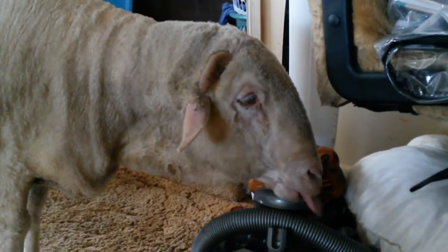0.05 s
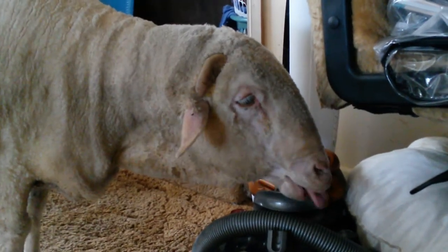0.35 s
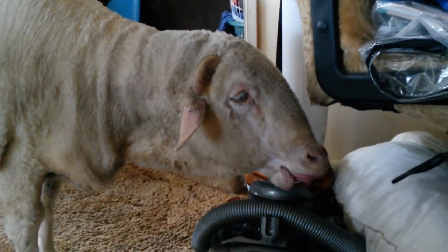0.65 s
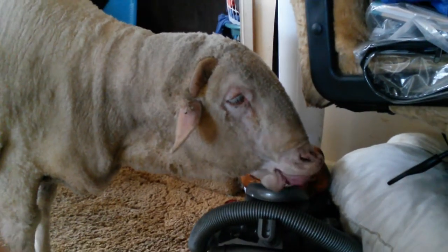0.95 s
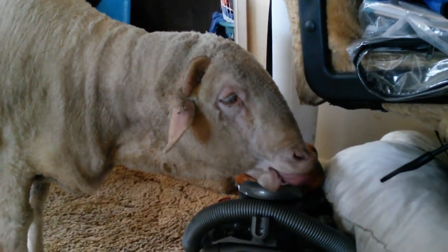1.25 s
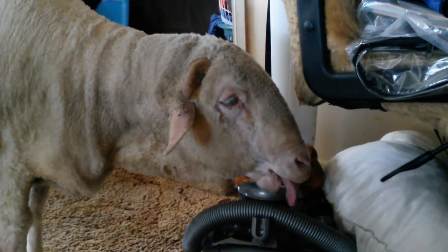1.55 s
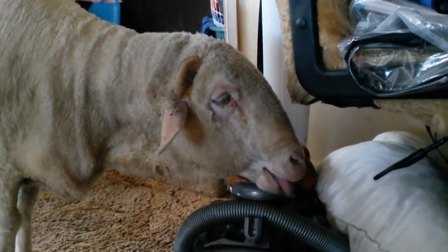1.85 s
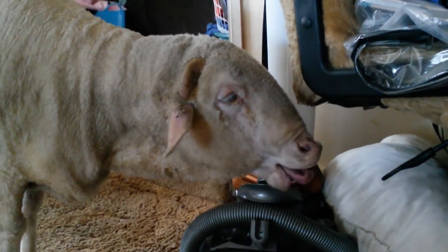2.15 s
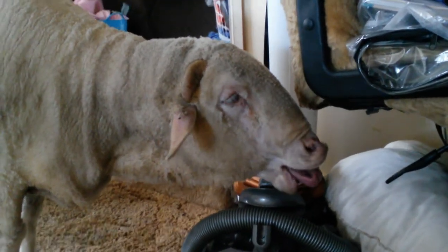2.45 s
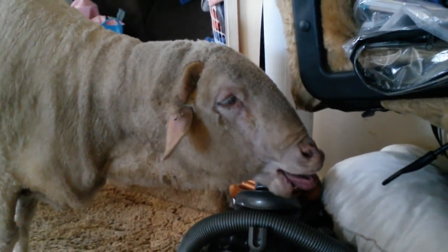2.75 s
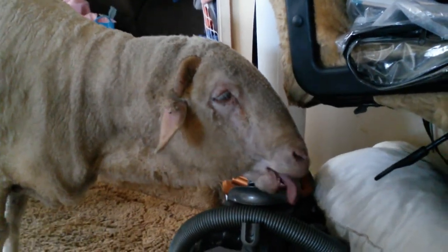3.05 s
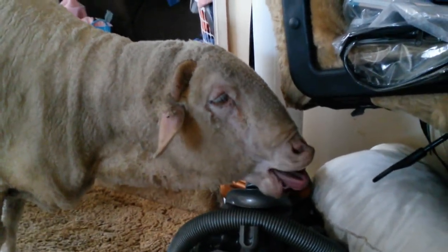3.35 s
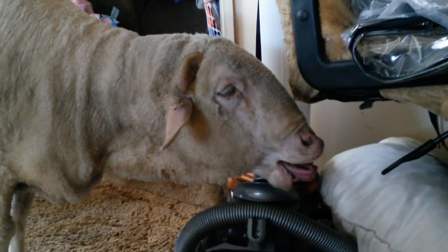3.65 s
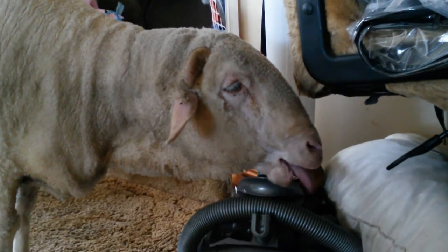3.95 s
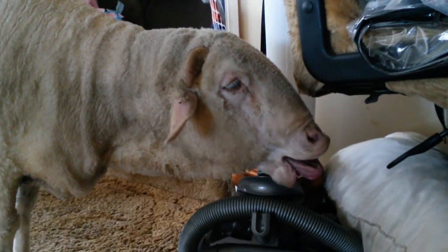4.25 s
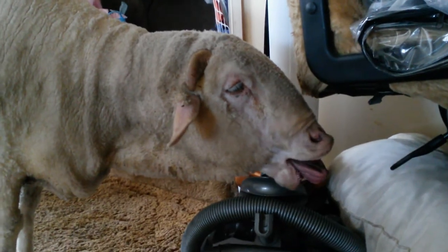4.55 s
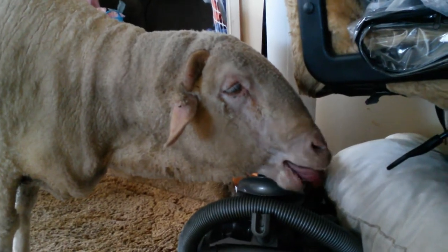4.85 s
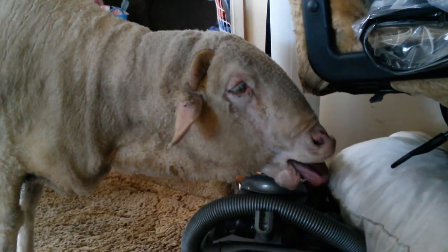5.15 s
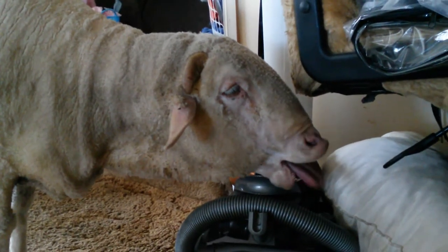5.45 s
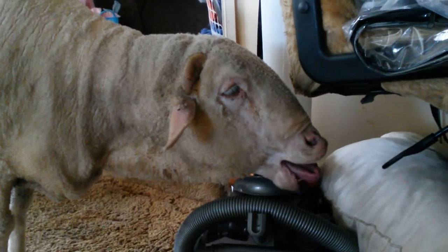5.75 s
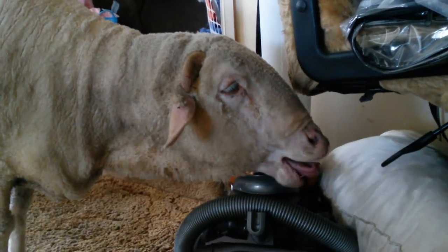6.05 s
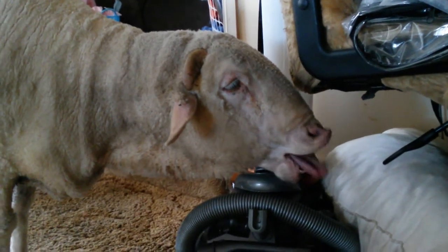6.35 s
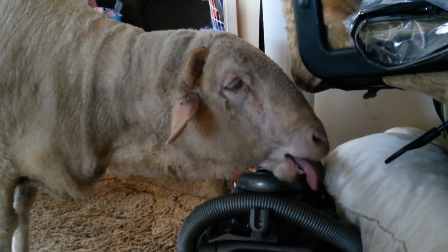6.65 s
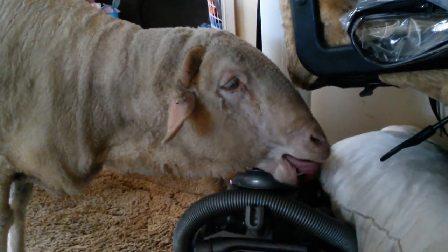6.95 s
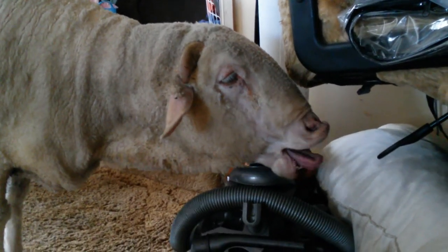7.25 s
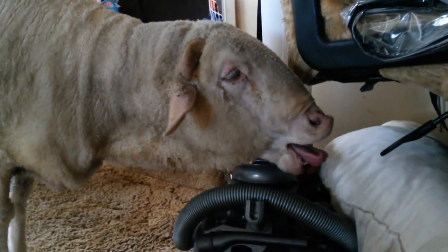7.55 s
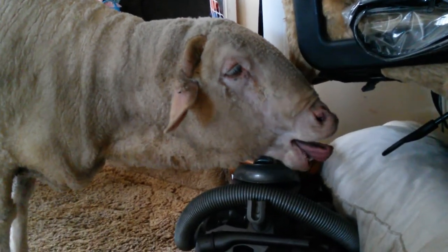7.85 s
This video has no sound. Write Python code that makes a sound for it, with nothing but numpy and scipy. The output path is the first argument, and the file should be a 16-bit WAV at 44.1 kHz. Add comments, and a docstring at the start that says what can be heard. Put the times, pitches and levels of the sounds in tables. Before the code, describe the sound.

A canister vacuum cleaner runs steadily close by, with a high whine over rushing, hissing air.

```python
"""First comes the steady roar and whine of a canister vacuum cleaner, close by in a carpeted room.
Air rushes through its body and hisses out of the vents.
The fan's eleven blades whine over the tone of the spinning shaft and a low electric hum.
The tones slowly swell and fade.
Near six seconds, fingers give the hand-held recorder a few soft bumps."""
import sys
import numpy as np
from scipy import signal
from scipy.fft import rfft, irfft, next_fast_len
from scipy.io import wavfile
from scipy.ndimage import map_coordinates

SR = 44100
rng = np.random.default_rng(int(sys.argv[2]) if len(sys.argv) > 2 else 0)


def materialize(psi):
    """Save the field psi as 16-bit PCM at rate SR to the path in sys.argv[1].

    A 1-D psi becomes a single channel; in a 2-D psi each row is a channel.
    """
    bounded = np.clip(np.atleast_2d(psi).T, -1, 1)
    quanta = np.round(bounded * 32767).astype(np.int16)
    wavfile.write(sys.argv[1], SR, quanta)


N = 356769
TIME = np.arange(N) / SR  # seconds


def amp(db):
    """Turn decibels into a number to multiply by."""
    return 10 ** (np.asarray(db) / 20)


def over_pitch(table, hz):
    """Read a table's columns at the given frequencies, on a logarithmic scale."""
    table_hz, *columns = np.transpose(table)
    return np.array([np.interp(np.log(hz + 1), np.log(table_hz + 1), column) for column in columns])


def over_time(table):
    """Join a table's (time, value) points with straight lines, one value per sample."""
    times, values = np.transpose(table)
    return np.interp(TIME, times, values)


def wobble(rate):
    """A smooth random curve through `rate` points a second."""
    points = rng.standard_normal(int(N * rate / SR) + 4)
    return map_coordinates(points, [TIME * rate])


def filtered(x, response):
    """Multiply each frequency in x by response(hz)."""
    size = next_fast_len(N + SR // 2)
    hz = np.fft.rfftfreq(size, 1 / SR)
    return irfft(rfft(x, size) * response(hz), size)[..., :N]


def tone(turns):
    """A pure tone of average power 1, one wave per turn."""
    return np.sqrt(2) * np.sin(2 * np.pi * turns)


# How alike the air sounds on the left and right: f/Hz, likeness/0-1
LIKENESS = [(30, 0.4), (100, 0.74), (330, 0.94), (470, 0.4), (650, 0.97), (1500, 0.67), (1850, 0.33),
            (2080, 0.87), (2900, 0.14), (3800, 0.47), (5200, 0.6), (6200, 0), (14000, 0.26)]
# How far the left wave runs ahead of the right: f/Hz, lead/radians
LEFT_LEAD = [(100, 0), (1000, 0.5), (1400, 0.5), (2700, -0.5), (4700, 1.96), (5400, 1.7), (6300, -4.5),
             (7500, -0.1), (10500, 1.4), (13000, 2.5)]

def turbulence():
    """Swirling air makes noise at every pitch, partly alike on the two sides."""
    common, apart = rng.standard_normal((2, N)) * np.sqrt(SR / 2)  # 0 dB per Hz
    sides = np.array([[1], [-1]])
    spread = lambda hz: np.arccos(np.clip(over_pitch(LIKENESS, hz), 0, 1)) / 2
    lead = lambda hz: np.exp(.5j * sides * over_pitch(LEFT_LEAD, hz))
    shared = filtered(common, lambda hz: np.cos(spread(hz)) * lead(hz))
    opposed = sides * filtered(apart, lambda hz: np.sin(spread(hz)) * lead(hz))
    return shared + opposed


# Air rushing through the body: f/Hz, left base level/dB per Hz, right base level/dB per Hz
BODY_ROAR = [(20, -95, -93), (50, -77, -84), (88, -63.5, -64), (180, -64, -64), (326, -67, -64.5),
             (484, -68.5, -69.5), (658, -59.5, -59), (860, -62.5, -62), (1390, -61.5, -62.5),
             (1766, -58.5, -63.5), (1890, -64, -66), (2530, -61.5, -64.0), (2864, -69.5, -78.5),
             (3390, -65, -65)]
# Vent jets, aimed unevenly: f/Hz, left base level/dB per Hz, right base level/dB per Hz
VENT_HISS = [(4155, -58, -64), (4700, -47.5, -65), (5130, -45.5, -65.5), (5480, -50, -63),
             (6670, -64, -61.5), (7660, -70, -61.5), (9000, -72, -64.5), (10370, -70.5, -58.5),
             (11600, -86.5, -57), (12400, -69.5, -59.5), (13600, -65.5, -59.5), (14500, -67, -66.5)]
# Pitches the body and duct boost or weaken: f/Hz, half width/Hz, left boost/dB, right boost/dB
RESONANCES = [(248, 17, -1.5, -2), (462, 22, -4, -8), (535, 17, -3.5, -4), (655, 14, -0.5, 2),
              (784, 16, -1.5, -4.5), (1126, 26, 3.5, 4.5), (1335, 45, 5, -1), (2013, 20, 6.5, 5.5),
              (2087, 95, 13, 13.5), (2890, 110, 1.5, 2.5), (3086, 30, 8, 8.5), (3435, 40, -11, -5),
              (3846, 74, 5, 4.5), (4625, 36, 4, 8), (4930, 69, -1.5, -6), (5000, 70, 2, 2),
              (5980, 71, -6.5, -4), (6040, 81, 6.5, -5), (6330, 110, -5, -5)]

def housing():
    """Swirling air makes the hollow body and its duct ring at some pitches more than others."""
    boost_db = lambda hz: sum(np.array([[left], [right]]) * np.exp(-((hz - centre) / width) ** 2)
                              for centre, width, left, right in RESONANCES)
    spectrum = list(BODY_ROAR) + list(VENT_HISS)
    return filtered(turbulence(), lambda hz: amp(over_pitch(spectrum, hz) + boost_db(hz)))


def room(x, fade_s=0.13, echo_db=-16, absorb_hz=5000):
    """The carpeted room adds a short, dull echo."""
    t = np.arange(SR // 4) / SR
    tail = rng.standard_normal((2, len(t))) * amp(-60 * t / fade_s)
    tail = tail / np.linalg.norm(tail[0])
    echo = signal.fftconvolve(x, tail, axes=1)[:, :N]
    dull_echo = filtered(echo, lambda hz: 1 / (1 + (hz / absorb_hz) ** 4))
    return (x + amp(echo_db) * dull_echo) / np.hypot(1, amp(echo_db))


# How the vent hiss rises and dips as air escapes more or less freely: t/s, level change/dB
HISS_CHANGE = [(0, 0.5), (0.6, 0.5), (1.2, -0.5), (1.9, 0), (2.6, 1.6), (4.2, 1.1), (4.8, 0), (6.05, -0.2),
               (6.45, 1.0), (8.09, 0.7)]

def air(rumble_hz=330, jet_hz=3600, vent_hz=6500, hoot_hz=2080, hoot_width_hz=170):
    """Rushing air: a steady roar, with a rumble, duct hoot, exhaust jet and vent hiss that drift."""
    rush = room(housing())
    below = lambda edge_hz: filtered(rush, lambda hz: 1 / (1 + (hz / edge_hz) ** 10))
    rumble = below(rumble_hz)
    hiss = rush - below(vent_hz)
    jet = rush - below(jet_hz) - hiss
    hoot = filtered(rush, lambda hz: np.exp(-((hz - hoot_hz) / hoot_width_hz) ** 2))
    roar = rush - rumble - hoot - jet - hiss
    settled = 1 - np.exp(-TIME / 2.3)  # rumble and jet creep up, then level off
    rumble_db = -2 + 2.5 * settled
    hoot_db = 0.14 - 0.14 * TIME + 0.5 * wobble(16)  # flutters and slowly eases off
    jet_db = -0.8 + 0.9 * settled + 0.32 * wobble(40)
    hiss_db = over_time(HISS_CHANGE) + 0.72 * wobble(45)
    return roar + rumble * amp(rumble_db) + hoot * amp(hoot_db) + jet * amp(jet_db) + hiss * amp(hiss_db)


# The blade whine, which beams at the right side: t/s, level/dB
RIGHT_WHINE = [(0, -20.5), (0.55, -19), (1.68, -22), (1.87, -29), (2.3, -20), (2.54, -22.5), (2.95, -20),
               (3.35, -19), (4.9, -26), (5.1, -24.5), (7.8, -24), (8.09, -23.3)]

def fan(turns, blades=11, jitter_cycles=0.013, right_lag_cycles=0.43, shimmer_db=0.78):
    """Each passing blade chops the air: a whine and its octave, shaken a little by the flow."""
    passes = blades * turns + jitter_cycles * wobble(40) - np.array([[0], [right_lag_cycles]])
    left_db = -37.5 + 2.5 * wobble(4.9)  # the left side gets only wandering reflections
    shimmer = shimmer_db * np.array([wobble(30), wobble(30)])
    level = amp(np.array([left_db, over_time(RIGHT_WHINE)]) + shimmer)
    octave_db = np.array([[-17], [-21]]) + 2 * wobble(6)  # left and right, compared with the whine
    return level * (tone(passes) + amp(octave_db) * tone(2 * passes))


# The tone of the slightly off-balance rotor: t/s, level/dB
SHAFT_LEVEL = [(0, -32), (2.0, -34), (5.3, -61), (8.09, -43.5)]
# The motor's magnetic hum: f/Hz, level/dB
COIL_HUM = [(100, -49.5), (200, -53), (300, -56.5)]

def motor(turns, waver_db=0.5):
    """The rotor shakes the case once a turn, and mains current makes the coils hum."""
    shaft = amp(over_time(SHAFT_LEVEL) + waver_db * wobble(10.13)) * tone(turns)
    hum = sum(amp(db + waver_db * wobble(4.1)) * tone(hz * TIME + rng.random()) for hz, db in COIL_HUM)
    return shaft + hum


# Soft finger bumps on the recorder: t/s, peak level on the right/dB
FINGER_BUMPS = [(5.759, -21), (5.940, -25), (6.270, -26), (6.335, -29), (6.378, -16), (6.440, -26),
                (6.580, -29), (6.720, -27)]

def handling(thud_hz=185, settle_hz=100, sag_s=0.0068, rise_s=0.0042,
             rustle_hz=60, grip_db=-65, slip_offset_db=-22.5, slip_s=0.097):
    """Fingers bump the recorder: dull thuds that drop in pitch, each in a rustle of slipping grip."""
    rustle = filtered(rng.standard_normal(N),
                      lambda hz: (hz / rustle_hz) ** 2 / (1 + (hz / rustle_hz) ** 5))
    rustle /= np.sqrt(np.mean(rustle ** 2))
    slip_power = sum(amp(db + slip_offset_db) ** 2 * np.exp(-((TIME - start) / slip_s) ** 2)
                     for start, db in FINGER_BUMPS)
    sound = np.sqrt(amp(grip_db) ** 2 + slip_power) * rustle  # even a resting grip rustles faintly
    for start, db in FINGER_BUMPS:
        age = np.maximum(TIME - start, 0)
        cycles = settle_hz * age + (thud_hz - settle_hz) * sag_s * (1 - np.exp(-age / sag_s))
        swell = (age / rise_s * np.exp(1 - age / rise_s)) ** 2
        sound -= amp(db) * swell * np.sin(2 * np.pi * cycles)
    return amp([[-17], [0]]) * sound  # the fingers are beside the right microphone


# How many times a second the motor's shaft turns: t/s, f/Hz
SHAFT_SPEED = [(0, 617.29), (3.1, 617.73), (8.09, 615.36)]

def scene():
    """One shaft drives the fan and rotor tones; air rushes around them and fingers add bumps."""
    turns = np.cumsum(over_time(SHAFT_SPEED)) / SR
    return air() + fan(turns) + motor(turns) + handling()


def record(dry, top_hz=14560, edge_hz=120):
    """The recorder cuts off the very highest pitches."""
    return filtered(dry, lambda hz: np.clip((top_hz - hz) / edge_hz + .5, 0, 1))


dry = scene()
out = record(dry)
materialize(out)
```